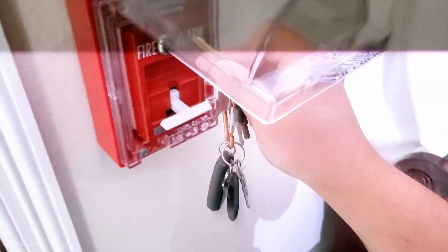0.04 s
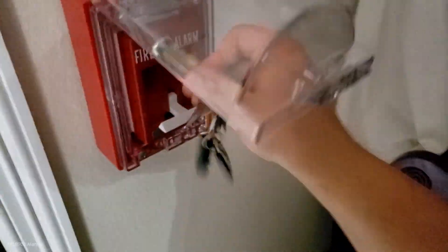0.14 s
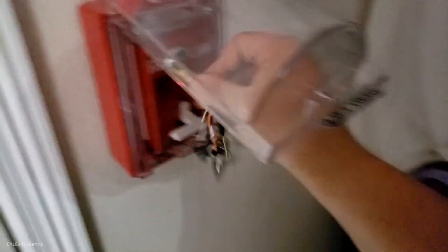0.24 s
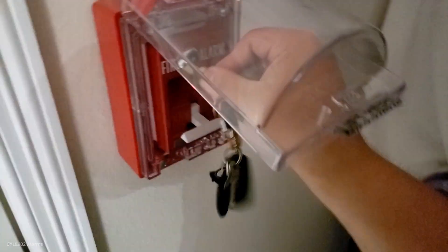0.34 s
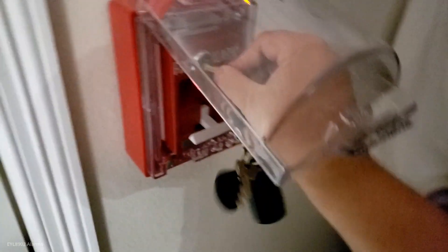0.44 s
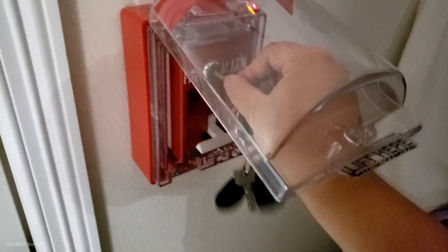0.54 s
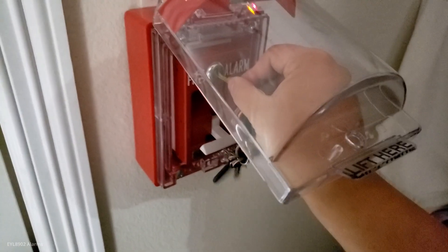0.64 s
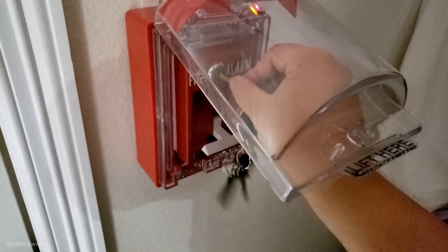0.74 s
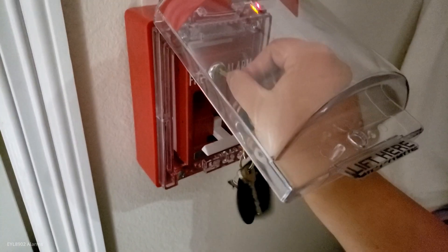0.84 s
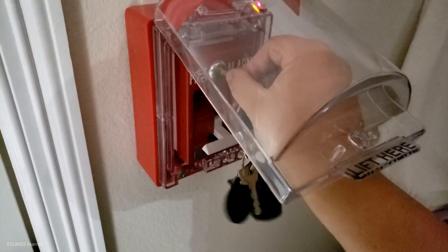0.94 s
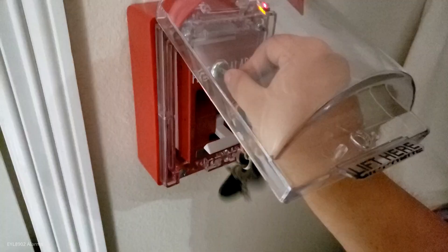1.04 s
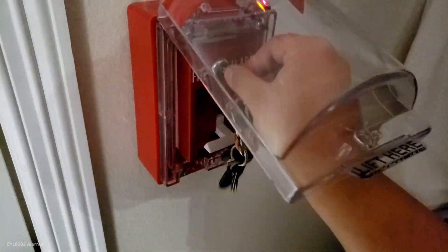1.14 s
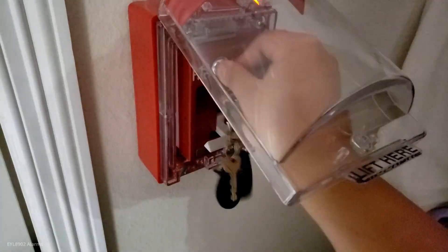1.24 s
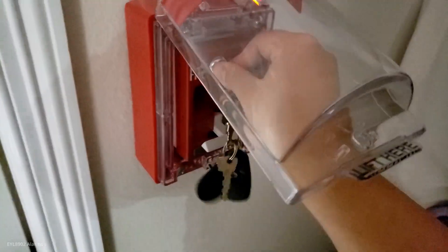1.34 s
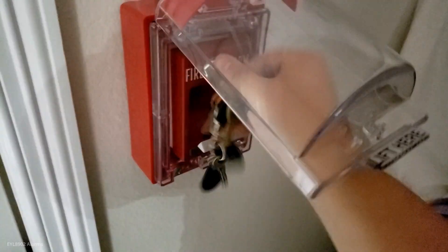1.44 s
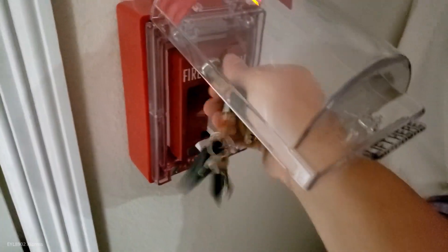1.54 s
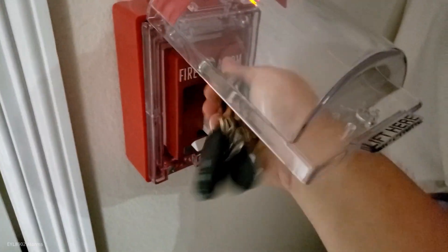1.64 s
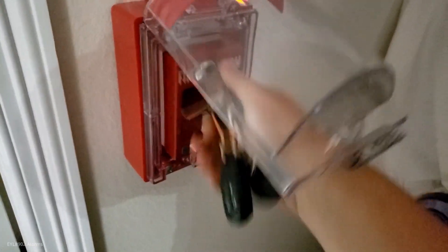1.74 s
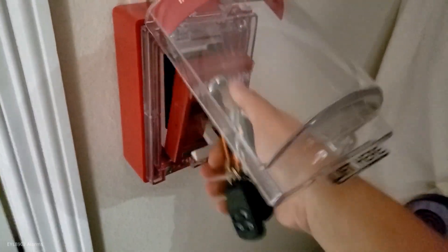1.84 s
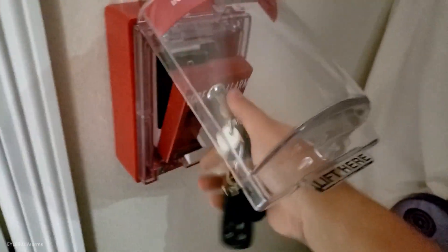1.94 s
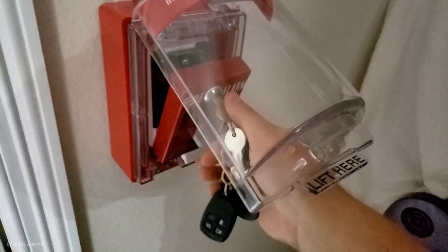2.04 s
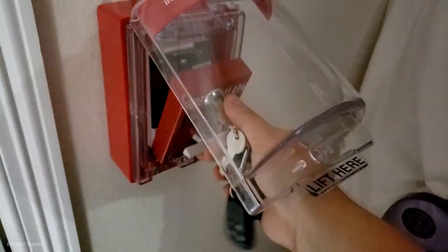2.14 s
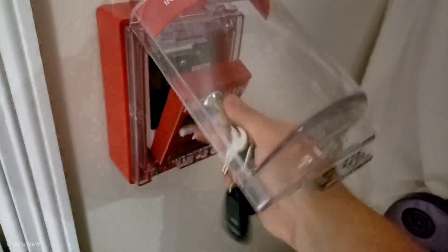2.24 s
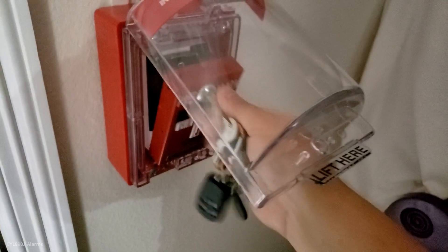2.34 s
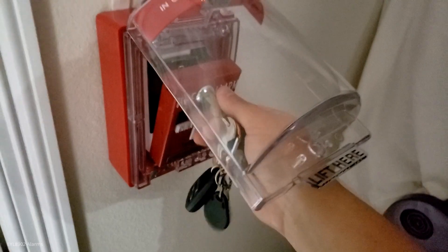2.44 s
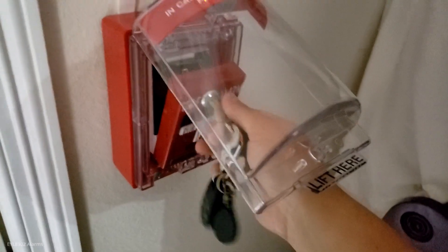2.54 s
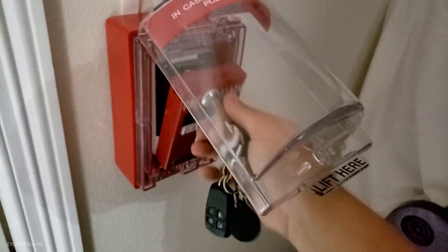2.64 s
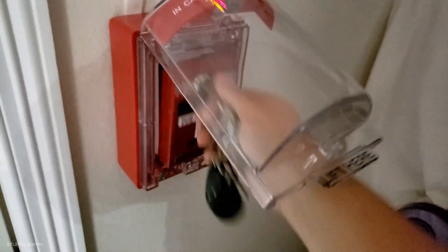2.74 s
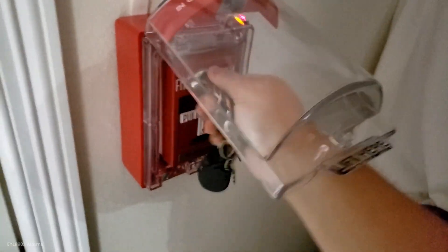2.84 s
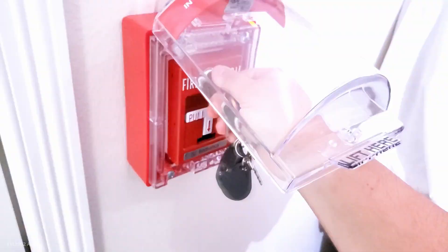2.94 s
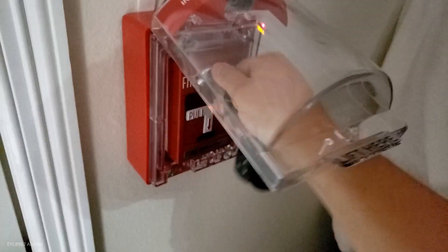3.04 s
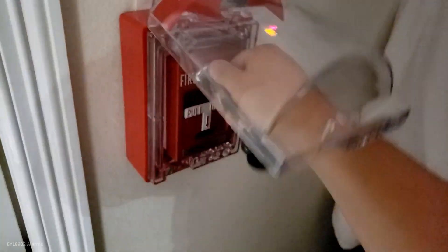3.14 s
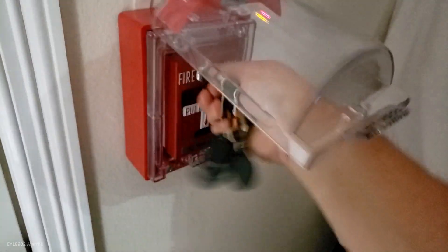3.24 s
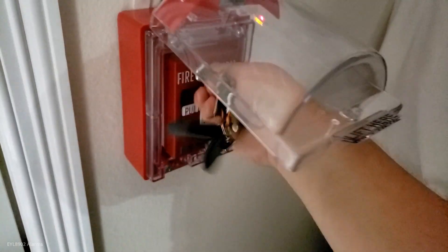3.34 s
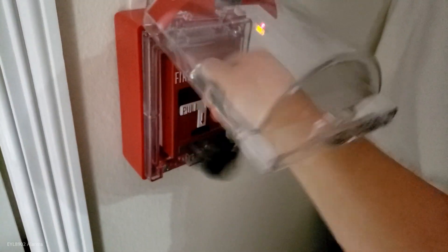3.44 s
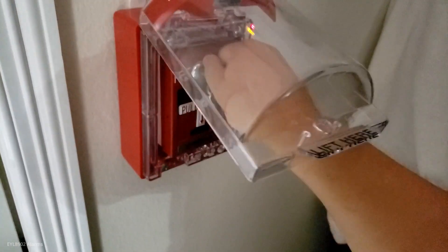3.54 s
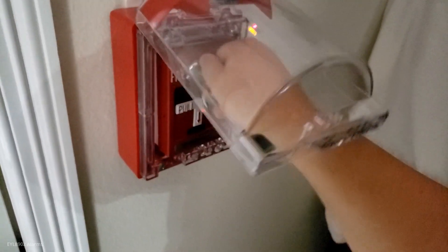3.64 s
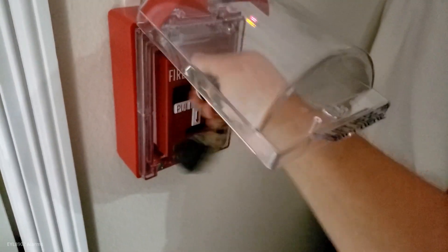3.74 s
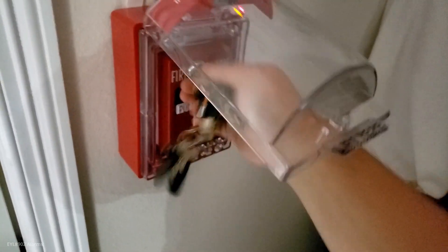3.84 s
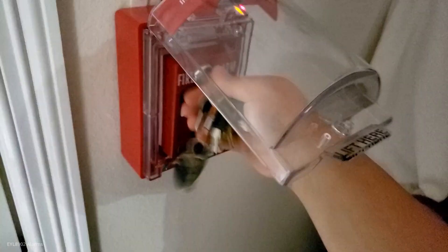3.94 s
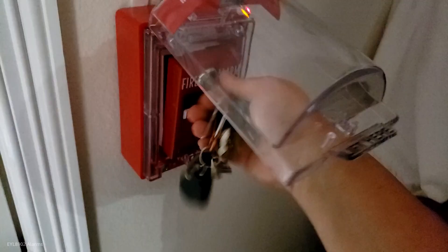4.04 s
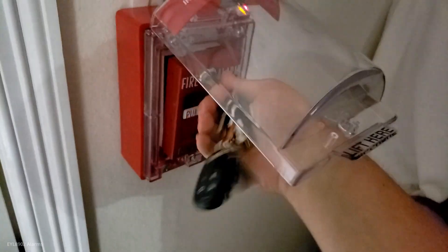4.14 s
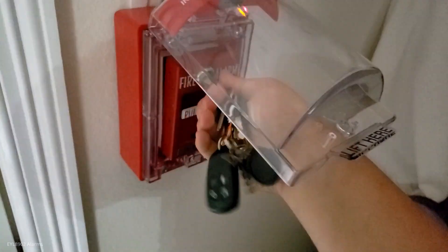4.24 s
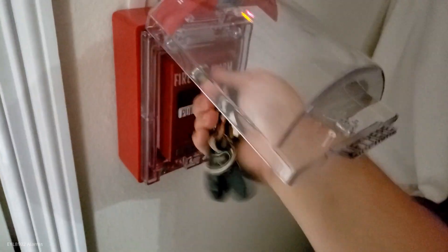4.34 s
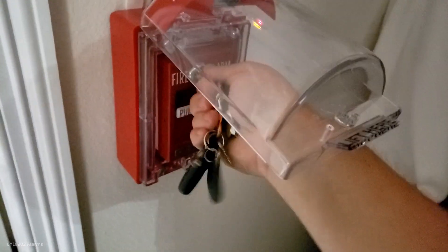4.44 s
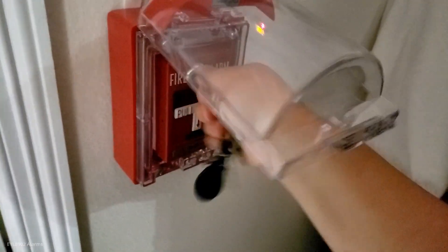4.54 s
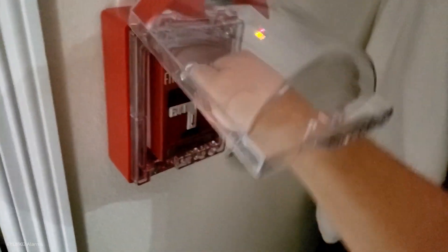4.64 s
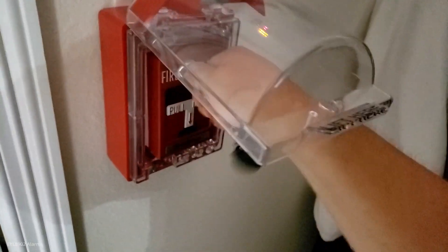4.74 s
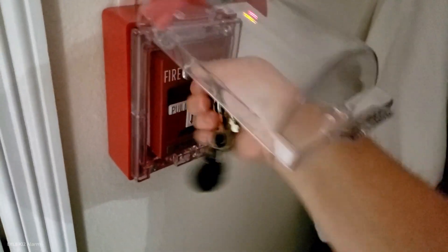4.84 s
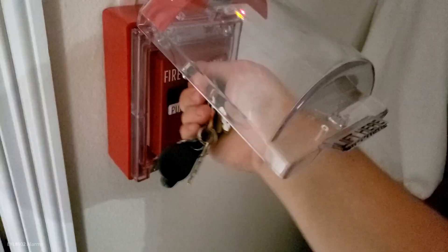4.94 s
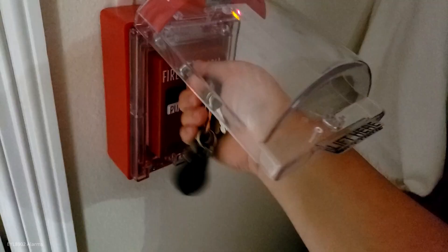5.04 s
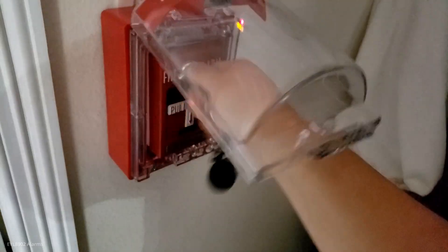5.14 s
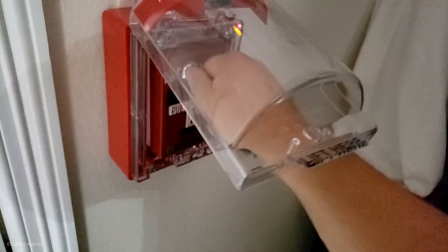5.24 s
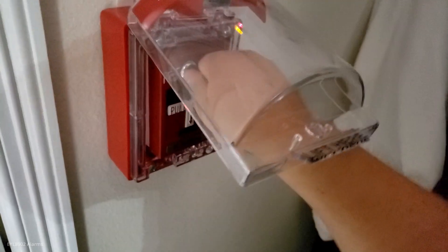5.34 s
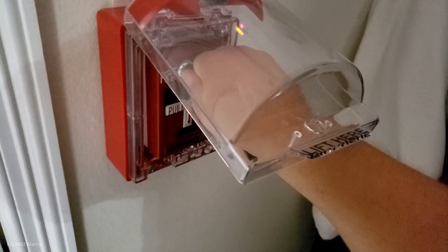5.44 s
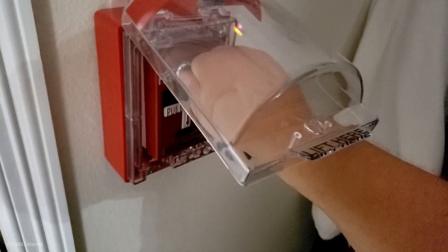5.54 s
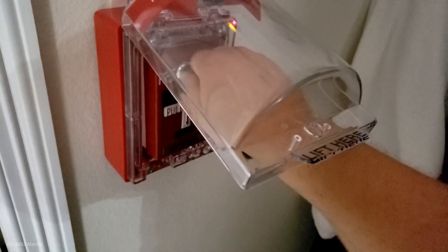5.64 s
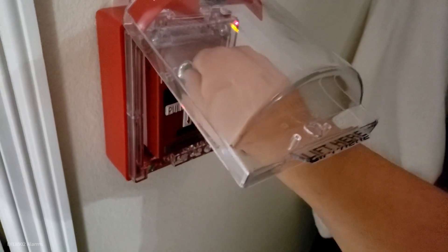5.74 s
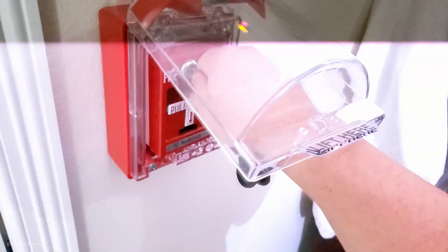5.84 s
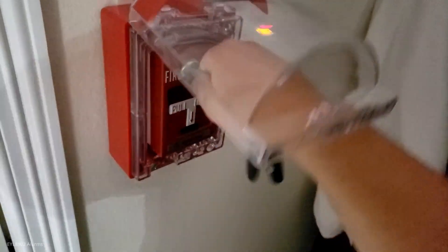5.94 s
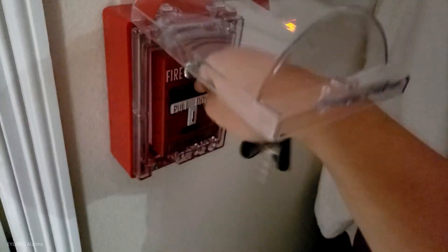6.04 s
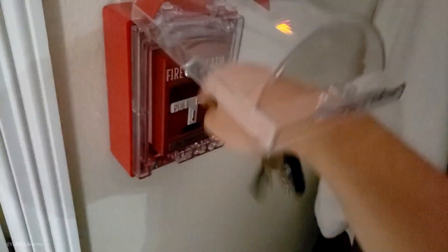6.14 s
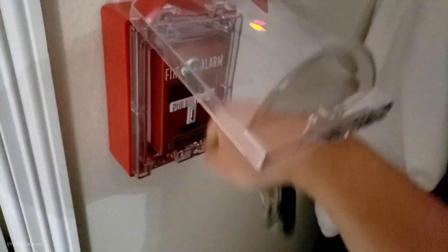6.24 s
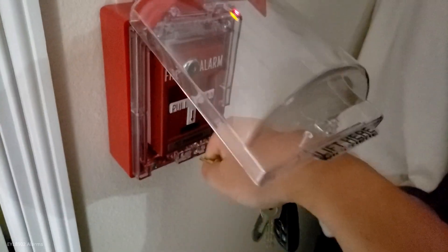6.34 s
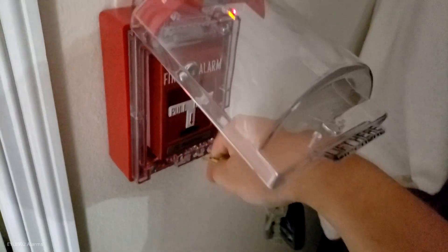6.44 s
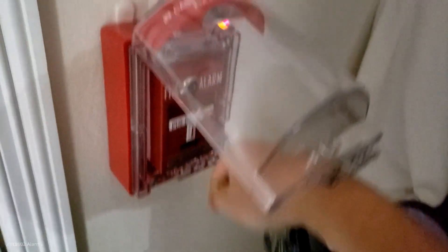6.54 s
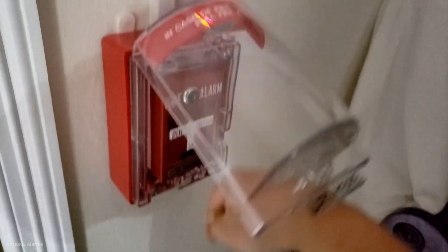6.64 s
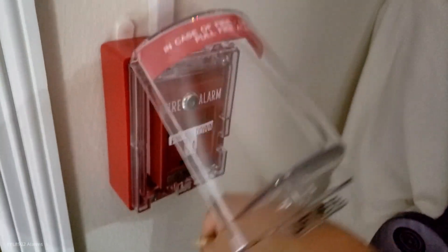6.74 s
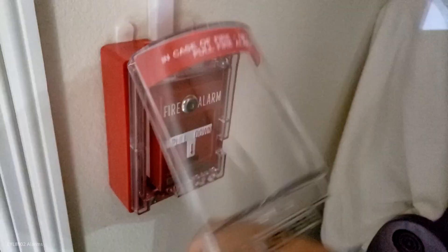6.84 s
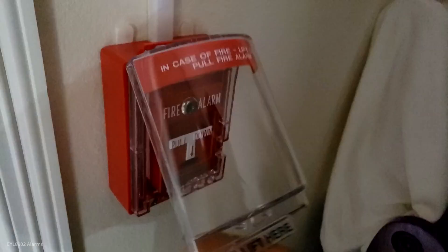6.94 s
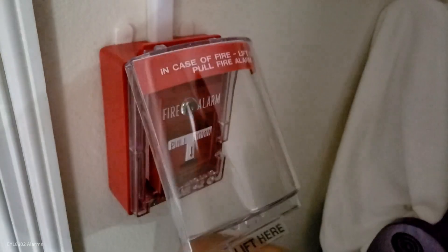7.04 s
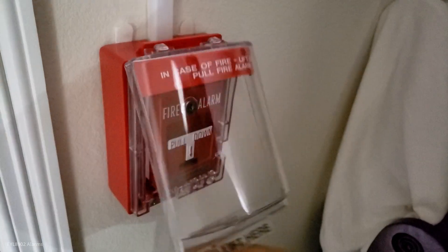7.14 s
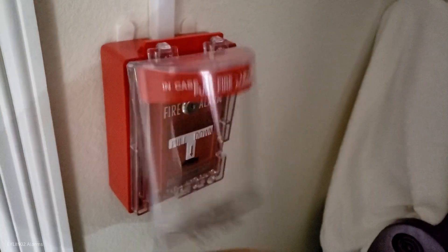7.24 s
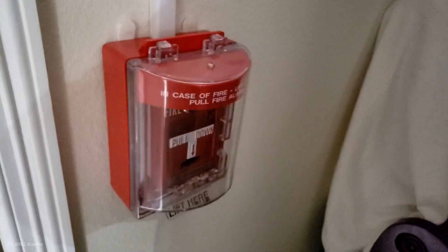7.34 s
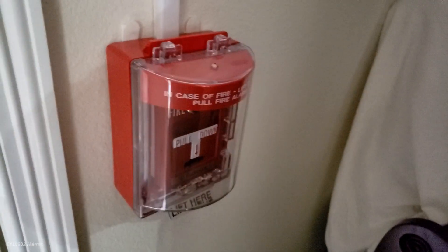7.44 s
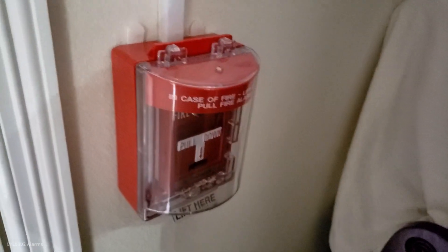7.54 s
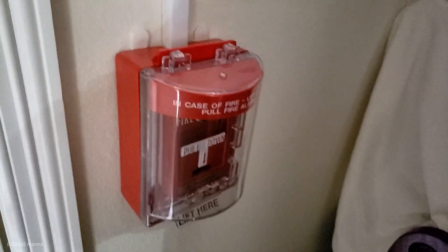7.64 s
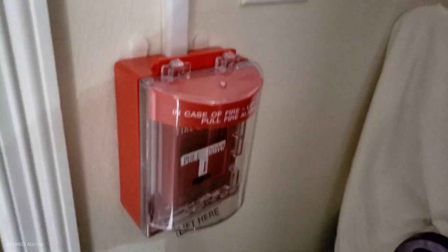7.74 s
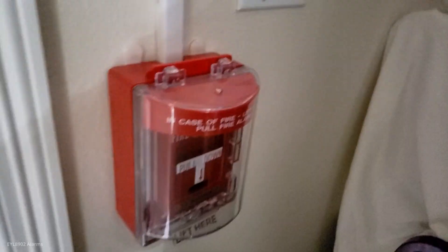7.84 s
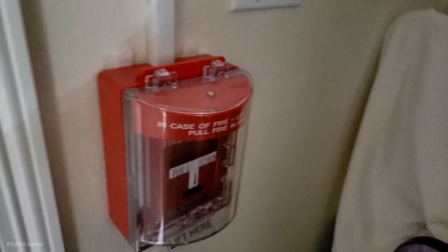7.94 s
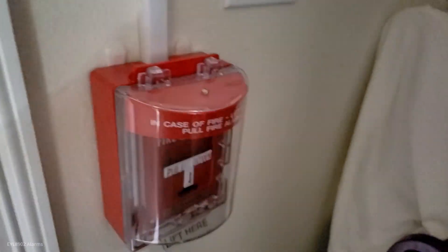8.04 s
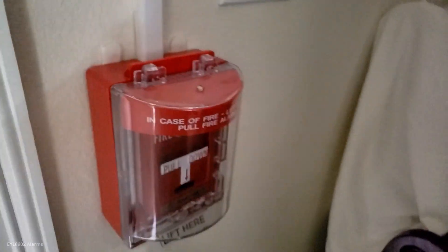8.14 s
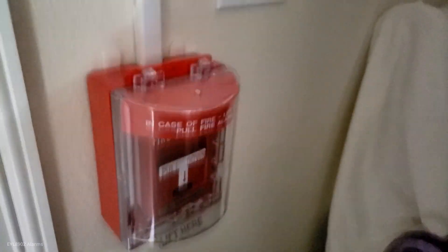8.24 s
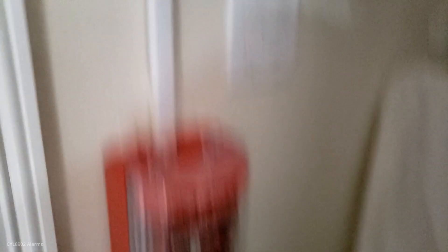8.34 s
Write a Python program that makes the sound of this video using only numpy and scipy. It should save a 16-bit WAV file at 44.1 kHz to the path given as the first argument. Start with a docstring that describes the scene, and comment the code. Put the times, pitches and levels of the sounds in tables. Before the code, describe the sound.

Close handling of a wall-mounted alarm box: keys tick and clink, plastic is scraped and pushed, and the lock plate clicks. Two hard clacks stand out in the first three seconds, followed by irregular knocking. Handling thins out, the clear cover claps down, near silence follows, then the caught keys rattle brightly at the end. Dry small room, faint hush, stereo pickup.

```python
"""Keys and fobs knock and rattle on a plastic wall box in a small furnished room: a bunch of keys works
its small lock, keys clink, the hand rubs and pushes the hollow housing. At last the hinged clear cover
drops shut and the bunch is caught in the hand. Knocks are noise bursts through housing resonances;
thuds, clinks, lock plate and cover are struck modes; handling is dense tiny contacts.
Two ports, a diffuse room and a quiet hush surround them."""
import sys
import numpy as np
from scipy import signal
from scipy.fft import rfft, irfft, next_fast_len
from scipy.io import wavfile

SR = 44100
rng = np.random.default_rng(int(sys.argv[2]) if len(sys.argv) > 2 else 0)


def volts_from_decibels(level):
    """Turn decibel levels (scalar or array-like) into linear amplitude factors."""
    exponent = np.asarray(level, float) / 20
    return 10 ** exponent


def wrap_up_sound(samples):
    """Save the sound to the file named by the first command line argument, as 16-bit audio."""
    columns = np.atleast_2d(samples).T
    # keep every value between -1 and 1, then stretch to whole-number steps
    tamed = np.clip(columns, -1, 1)
    steps = np.round(tamed * 32767).astype(np.int16)
    wavfile.write(sys.argv[1], SR, steps)


N = 370881
SIZE = 8192   # samples of one knock or tick

# room hush spectrum: f/Hz, density/dB
HUSH_SPECTRUM = [(24, -35.5), (40, 2), (118, -21), (180, -1), (276, -7.5), (372, -9.5), (697, -28),
                 (2320, 7), (4030, -4), (16000, -40)]
# room decay: f/Hz, t60/s
ROOM_T60 = [(100, .3), (700, .26), (2000, .3), (5000, .25), (13000, .2)]
# room level: f/Hz, level re direct/dB
ROOM_DB = [(100, -20), (450, -16), (1000, -8), (3000, -7), (14000, -7)]
# first port over second: f/Hz, level difference/dB
PORT_DB = [(60, 1), (500, -4), (850, 4.5), (1800, 5), (2700, 11), (4300, 6), (5500, 3), (7100, -2),
           (7800, -4), (9800, -1), (11000, -12.5), (12500, -10.5), (14500, -5)]
# first port ahead of second: f/Hz, phase/rad
PORT_LEAD_RAD = [(60, 0.65), (500, -1), (700, 1.38), (1600, 3), (2500, 1.02), (16000, 2.1)]
# power common to both ports: f/Hz, share/1
COMMON_SHARE = [(60, 1), (450, 1), (700, 0.94), (1200, 0.6), (1900, 0.32), (2900, 0.53), (4000, 0.41),
                (16000, 0.12)]
# busy hand: t/s, scrape level/dB, push level/dB, jingle level/dB
HANDLING = [(0, -55, -51.5, -67), (.3, -57.5, -72, -58), (.55, -73, -69, -68.5), (.94, -79, -60, -96),
            (1.29, -38, -42, -47.5), (1.38, -71, -52, -86), (1.6, -44, -46.5, -43.5),
            (1.83, -46.5, -49, -46.5), (2.22, -70, -67, -66.5), (2.36, -59, -48, -60.5),
            (2.6, -75, -72.5, -69.5), (3.2, -57, -57, -69.5), (3.3, -40.5, -42.5, -55.5),
            (3.68, -69.5, -67, -64.5), (3.95, -49, -55.5, -57), (4.4, -64, -58.5, -63.5),
            (4.64, -47, -51, -58), (4.8, -68, -59, -74), (5.36, -56, -50.5, -73.5), (5.64, -81, -71.5, -78),
            (5.76, -57.5, -52, -59.5), (6.09, -47, -45, -48.5), (6.35, -72.5, -60, -73),
            (6.74, -74.5, -86.5, -90), (7.0, -68.5, -60.5, -77), (7.42, -65, -79.5, -73.5),
            (7.96, -82, -97, -92), (8.08, -83, -95, -84), (8.18, -71.5, -89, -46), (8.26, -46.5, -60, -33),
            (8.36, -35.5, -55, -40), (8.41, -41, -54, -33)]
# cover bumped: t/s, level/dB
COVER_BUMPS = [(7.266, -40.5), (7.375, -27.5), (7.395, -22)]
# lock plate snapped: t/s, level/dB
PLATE_SNAPS = [(1.674, -33), (1.822, -35.5), (1.84, -32), (1.8557, -25.5), (3.2365, -35), (6.0615, -41.5)]
# key against key: t/s, level/dB
CLINKS = [(0.2384, -44), (0.2644, -40), (0.3431, -47), (0.3765, -34), (0.4309, -45), (0.4618, -33),
          (0.4888, -34), (1.3259, -40), (1.5743, -38.5), (1.7335, -27), (1.7988, -28.5), (1.8577, -33),
          (2.4209, -30.5), (2.58, -58.5), (3.272, -35), (3.6321, -44), (3.7848, -60), (3.9014, -40.5),
          (4.0731, -40.5), (4.1255, -42), (4.1704, -40), (4.2956, -36), (4.6418, -45), (4.7242, -44.5),
          (5.1577, -44), (5.3557, -51.5), (5.8945, -34.5), (5.9633, -44), (6.1689, -30), (6.3589, -53.5),
          (8.1125, -57)]
# long key on its ring: t/s, level/dB
RING_CLINKS = [(8.2067, -34), (8.2274, -21), (8.2457, -14), (8.2844, -16), (8.2994, -18), (8.3544, -16),
               (8.3894, -49)]
# key tips glancing off metal: t/s, level/dB, ringing f/Hz
TICKS = [(0.1344, -41, 5240), (0.1431, -32, 10260), (0.188, -33, 13600), (0.2149, -39, 12300),
         (0.3785, -23.5, 12200), (0.4823, -24, 12200), (0.5774, -42, 12200), (1.3223, -23.5, 12200),
         (1.6744, -38, 12200), (1.8144, -18.5, 12060), (1.9994, -32.5, 5220), (3.2546, -29.5, 10500),
         (3.378, -33, 5100), (3.4181, -36, 5300), (3.786, -33, 6120), (4.1709, -22, 12150),
         (4.2967, -30, 12100), (5.0295, -50, 12300), (5.893, -23, 12300), (6.1684, -31, 12200),
         (6.3584, -42, 12170), (8.1074, -49.5, 12250)]
# thuds of the hollow box: t/s, level/dB, leading f/Hz
THUDS = [(0.056, -30, 346), (0.166, -35.5, 151), (0.247, -34.5, 225), (0.427, -47.5, 151),
         (0.671, -30.5, 160), (0.846, -35.5, 107), (0.893, -34.5, 166), (1.123, -31, 161),
         (1.26, -20.5, 142), (1.38, -37, 167), (1.466, -21.5, 220), (2.293, -23.5, 520),
         (2.671, -38.5, 226), (2.833, -39, 380), (2.84, -20, 161), (3.071, -39, 353), (3.151, -34, 157),
         (3.272, -24.5, 235), (3.481, -32.5, 190), (3.568, -38.5, 365), (3.743, -45.5, 102),
         (3.889, -32.5, 226), (3.961, -38.5, 111), (4.147, -35.5, 364), (4.376, -24.5, 100),
         (4.543, -37, 167), (4.606, -32.5, 365), (4.85, -26, 151), (5.181, -27.5, 380), (5.358, -37, 167),
         (5.512, -40, 358), (5.734, -27.5, 215), (5.809, -28, 156.7), (6.053, -22.5, 164),
         (6.137, -32.5, 158), (6.307, -35.5, 177), (6.438, -39.5, 222.5), (6.82, -52.5, 175.5),
         (6.952, -30, 175.6), (7.291, -32.5, 225), (7.39, -19.5, 353), (8.204, -20.5, 495),
         (8.216, -23.5, 252), (8.275, -16.5, 159.7)]
# knocks on the box: t/s, level/dB, struck spot f/Hz, hardness (4-8 kHz)/dB, rattle t60/s
KNOCKS = [(.059, -27, 2510, -13, 0.057), (.075, -21.5, 2260, -13.5, .18), (.159, -28, 2410, -14, 0.11),
          (.225, -36, 2310, -2, 0.052), (.246, -16.5, 1390, -6.5, 0.08), (.375, -39, 3500, 0, 0.066),
          (.422, -38.5, 2110, -16, 0.081), (.538, -38.5, 2380, -7, 0.041), (.634, -32.5, 2730, -25, 0.21),
          (.654, -28, 2070, -11.5, 0.05), (.674, -19, 1360, -25, 0.036), (.712, -24.5, 1290, -7, 0.023),
          (.817, -37.5, 2050, -16, 0.1), (.844, -26.5, 1960, -10, .18), (.901, -22, 1970, -16.5, 0.13),
          (1.072, -23.5, 1560, -7.5, 0.23), (1.18, -23, 1030, -29, 0.2), (1.203, -19.5, 1370, -11.5, 0.26),
          (1.259, -16, 1050, -8, 0.12), (1.392, -29, 2500, -12.5, 0.073), (1.407, -27, 1560, -12, .077),
          (1.455, -20.5, 1410, -17.5, .15), (1.477, -16, 865, -18, 0.1), (1.516, -13, 1120, -12, 0.17),
          (1.556, -17.5, 1130, -8.5, 0.028), (1.606, -14, 3100, -10.5, 0.094), (1.661, -23, 1020, 0, 0.034),
          (1.724, -28, 2340, 4.5, 0.25), (1.781, -18.5, 2900, -2, 0.14), (1.859, -18, 1010, -2.5, 0.027),
          (1.972, -28, 2580, 4.5, 0.038), (1.99, -31, 3130, 2.5, 0.14), (2.027, -37, 2780, 1.4, 0.063),
          (2.079, -41, 2930, -6.5, 0.049), (2.173, -38, 3000, 1.5, 0.03), (2.214, -39.5, 3340, -1.5, 0.059),
          (2.277, -25.5, 2240, -2.5, 0.17), (2.288, -6, 2400, -2.5, 0.12), (2.326, -13, 2240, -10.5, .064),
          (2.404, -29, 2700, -3.5, 0.2), (2.504, -32, 2440, -8, 0.027), (2.576, -39.5, 2940, -2.5, 0.031),
          (2.653, -41.5, 2450, -19.5, .084), (2.669, -34.5, 2380, -13.5, 0.3),
          (2.818, -32, 1500, -10, 0.22), (2.843, -3, 1120, -10.5, 0.02), (3.07, -29.5, 2660, -16, 0.068),
          (3.154, -11.5, 2380, -6.5, 0.035), (3.24, -31, 1020, -11, 0.22), (3.274, -17.5, 2600, -12, 0.071),
          (3.296, -13, 2120, -18, 0.068), (3.323, -17, 1530, -15.5, 0.045), (3.405, -33.5, 2070, -12, 0.12),
          (3.482, -22, 2710, -20, 0.15), (3.524, -23, 1450, -7, 0.037), (3.574, -26, 865, -13.5, 0.11),
          (3.629, -37, 2220, 1, 0.083), (3.752, -37.5, 2370, 0, 0.12), (3.871, -28, 2120, -22, 0.089),
          (3.971, -12.5, 2700, -9.5, 0.042), (4.018, -32, 1040, -1, 0.18), (4.085, -32.5, 1820, -19, 0.026),
          (4.121, -31, 1510, -17, 0.13), (4.154, -30.5, 1500, 5.5, 0.11), (4.227, -30, 1490, -14, 0.068),
          (4.318, -36.5, 3000, 10, 0.25), (4.382, -7.5, 1470, -10.5, 0.042), (4.432, -24, 1440, -22, 0.083),
          (4.527, -33, 3230, 0, 0.024), (4.549, -10.5, 2020, -7, 0.039), (4.603, -18.5, 2580, -11, 0.1),
          (4.836, -32.5, 2750, -10, 0.079), (4.854, -13.5, 1740, -10, 0.097),
          (4.881, -17, 1910, -18.5, 0.09), (5.125, -36, 1610, -22, .12), (5.139, -26, 2050, -9.5, 0.14),
          (5.184, -16, 2850, -19.5, 0.081), (5.259, -36, 860, -15.5, 0.18), (5.367, -26, 1430, -10, 0.049),
          (5.423, -22, 1520, -8.5, 0.1), (5.514, -16.5, 2530, -5, 0.03), (5.552, -35.5, 1430, -25, 0.028),
          (5.694, -33.5, 1430, -11.5, .04), (5.741, -37, 1400, 1, 0.13), (5.806, -34, 1490, -2.5, 0.14),
          (5.885, -28, 3280, -1.5, 0.26), (5.931, -27, 2930, 7, 0.061), (5.951, -28.5, 2810, -0.5, 0.2),
          (5.996, -29.5, 2830, -2.5, 0.13), (6.028, -26.5, 1890, 1, .16), (6.059, -11, 1390, -10.5, 0.051),
          (6.141, -25, 1870, -2, .024), (6.211, -31.5, 3340, -0.5, 0.033), (6.245, -35, 3300, 1, 0.12),
          (6.308, -29, 2800, -16, 0.1), (6.473, -42, 1390, -20, .053), (6.492, -38, 2240, -17, 0.053),
          (6.954, -31.5, 2970, -21, .11), (6.985, -35, 857, -18.5, 0.084), (7.243, -40, 2620, -23.5, 0.17),
          (7.262, -24.5, 1520, -16.5, 0.22), (7.308, -23.5, 2120, -23, 0.23), (7.366, -26, 900, -14, .04),
          (7.375, -4.5, 2600, -9.5, .12), (7.391, -6.5, 2400, -9, 0.13), (8.202, -15, 3420, -11.5, 0.2),
          (8.246, -8, 2700, -6, 0.14), (8.27, -11.5, 3500, -8, .18), (8.316, -16.5, 2210, -9, 0.063)]
# modes of hollow box, cover, lock plate, keys, long key: f/Hz, level/dB, t60/s
WALL_BOX = [(58, -16, .08), (112, -4, .12), (156, 0, .13), (218, -4, .1), (285, -11, .06), (372, -7, .1),
            (494, -6, .08), (600, -10, .05)]
COVER = [(357, -1, .15), (354, -11, .55), (385, -8, .09), (424, -3, .15), (890, -10, .12), (1545, -4, .18),
         (2143, -7, .13), (2396, -7, .16)]
PLATE = [(1028, 0, .26), (1042, -11, .1)]
KEYS = [(6207, -20, .12), (9350, -19, .05), (10260, -15, .15), (10470, -19, .1), (12110, -6, .1),
        (12190, -2, .11), (12280, -5, .1), (15160, -12, .12)]
LONG_KEY = [(13200, -7, .1), (13740, -11, .07), (14480, -20, .06)]
# broad contact crack: f/Hz, level/dB
CRACK = [(400, -7.5), (700, -12), (1000, -5.5), (1800, -4.5), (2700, -2), (4000, -14), (6300, -13.5),
         (8000, -22.5), (10000, -11.5), (12500, -9), (15500, -12.5)]
# resonances of housing and key tips: f/Hz, width/Hz, lift over crack/dB
HOUSING = [(516, 17, 7.5), (860, 47, 6), (1030, 150, 6), (1390, 220, 5.5), (1525, 120, 6), (1906, 270, 3),
           (2120, 65, 4), (2330, 30, 3.5), (2850, 47, 1), (3094, 260, 3.5), (3958, 800, 6.5),
           (4600, 220, 7.5), (5640, 190, 4.5), (5750, 250, -0.5)]
KEY_TIPS = [(5300, 150, 8), (6200, 120, 8), (10300, 150, 7), (12190, 220, 9), (13750, 200, 7),
            (15200, 200, 7)]
# corners: body end, full hardness, metal edge start, full metal edge: f/Hz
TILT_HZ = [3000, 5500, 6820, 11440]
# bass loss of light blows: full below, none above: f/Hz
LIGHT_BASS_HZ = [703, 2200]

HUSH_DB = -87
KEYS_LEAVE_S = 6.5   # end of swinging and chance taps
# push lingering after each thud; high thuds are glancing and leave less
LEAN_DB, LEAN_DB_PER_OCTAVE, LEAN_RISE_S, LEAN_T60_S = -8.0, -3.5, 0.012, 0.31
COVER_SHUT_S, HAND_GONE_DB = 7.2, -20   # later thuds leave less push
BRUSH_RE_JINGLE_DB, SWAY_RE_CLINK_DB, SWAY_T60_S = -12.5, -33, 0.73
FIRM_SHARE = 0.75   # power of a touch that is one firm first contact
TAPS_PER_S, TAP_RE_SCRAPE_DB, TAP_SPREAD_DB = 10, 12.0, 4
TAP_HARD_DB, TAP_HARD_SPREAD_DB, TAP_T60_S = -4.0, 4.9, 0.05
EDGE_RE_HARD_DB, EDGE_DB_PER_DB = -7, -0.075   # louder blows carry less metal edge
EDGE_FOLLOWS_JINGLE = 0.38   # share of jingle's lead over scrape
LIGHT_BELOW_DB, LIGHT_LOSS_DB_PER_DB = -24.5, 0.41   # light hard blows barely move the housing


def at_hz(points, hz):
    """Short spectrum read on a log frequency axis."""
    f, value = np.transpose(points)
    return np.interp(np.log(hz + 1), np.log(f), value)


def rms_one(x):
    """Scale to unit power."""
    return x / np.sqrt(np.mean(np.abs(x) ** 2) + 1e-20)


def mode_bank(modes, hz):
    """Frequency response of each decaying sine, one row a mode."""
    f, level_db, t60 = np.transpose(modes)[:, :, None]
    r = volts_from_decibels(-60 / (t60 * SR))
    w = 2 * np.pi * f / SR
    z = np.exp(-2j * np.pi * hz / SR)
    return volts_from_decibels(level_db) * np.sin(w) * z / (1 - 2 * r * np.cos(w) * z + r * r * z * z)


def band(hz, low_hz, high_hz):
    """Causal band-pass response."""
    sos = signal.butter(3, [low_hz, high_hz], "band", fs=SR, output="sos")
    return signal.sosfreqz(sos, hz, fs=SR)[1]


def grit(shape, per_s, spread_db):
    """Random small contacts of uneven size and sign."""
    sizes = volts_from_decibels(spread_db * np.minimum(rng.exponential(1, shape), 4))
    signs = rng.choice([-1, 1], shape)
    return sizes * signs * (rng.random(shape) < per_s / SR)


def add(out, at_s, bursts):
    """Lay each burst down at its moment."""
    for k, i in enumerate((np.asarray(at_s) * SR).astype(int)):
        out[..., i:i + bursts.shape[-1]] += bursts[..., k, :N - i]
    return out


def two_paths(common, left, right, hz):
    """Bass reaches both ports alike, treble largely by scattered paths of its own."""
    share = at_hz(COMMON_SHARE, hz)
    return np.sqrt(share) * common + np.sqrt(1 - share) * np.array([left, right])


def near_pitch(modes, spot_hz, octaves):
    """Modes close to the pitch of the struck spot are favoured."""
    distance = np.log2(np.array(modes)[:, 0] / spot_hz) / octaves
    return np.exp(-.5 * distance ** 2)


def body(hz, strengths, tilt_db=0):
    """Contact crack lifted at housing and key resonances; minimum phase, so nothing sounds early."""
    f, width, lift_db = np.transpose(HOUSING + KEY_TIPS)[:, :, None]
    resonances_db = strengths @ (lift_db / (1 + (2 * (hz - f) / width) ** 2))
    level_db = at_hz(CRACK, hz) + tilt_db + resonances_db
    cepstrum = irfft(level_db * np.log(10) / 20)
    half = cepstrum.shape[-1] // 2
    cepstrum[..., 1:half] *= 2   # fold to minimum phase
    cepstrum[..., half + 1:] = 0
    return np.exp(rfft(cepstrum))


def hush(size):
    """Steady shaped noise, independent at the two ports."""
    hz = np.fft.rfftfreq(size, 1 / SR)
    noise = rfft(rng.standard_normal((2, size)))
    return volts_from_decibels(HUSH_DB) * rms_one(irfft(noise * volts_from_decibels(at_hz(HUSH_SPECTRUM, hz)), size)[:, :N])


def room(size):
    """Diffuse tail, unrelated at the two ports, with a decay for each octave."""
    t, hz = np.arange(SR // 2) / SR, np.fft.rfftfreq(size, 1 / SR)
    out = 0
    for mid_hz in 80 * 2.0 ** np.arange(8):
        decay = volts_from_decibels(-60 * t / at_hz(ROOM_T60, mid_hz)) * np.clip(t / 0.0013, 0, 1)
        tail = rng.standard_normal((2, len(t))) * decay
        tail /= np.sqrt(np.sum(tail ** 2, axis=1, keepdims=True))
        octaves_off = np.abs(np.log2(np.clip(hz, 80, 10240) / mid_hz))
        out = out + rfft(tail, size) * np.sqrt(np.clip(1 - octaves_off, 0, 1))
    return out * volts_from_decibels(at_hz(ROOM_DB, hz))


def port_responses(hz):
    """Level and phase difference split evenly over two ports of unit mean magnitude."""
    side = np.array([[.5], [-.5]])
    ports = volts_from_decibels(side * at_hz(PORT_DB, hz)) * np.exp(1j * side * at_hz(PORT_LEAD_RAD, hz))
    return ports / np.abs(ports).mean(axis=0)


def hand(at_s):
    """Scrape, push and jingle levels in dB at these moments."""
    s, *levels = np.transpose(HANDLING)
    return [np.interp(at_s, s, db) for db in levels]


def aftermath(events, gain_db, rise_s, t60_s):
    """A level that swells after each event and dies away."""
    s, level_db = np.transpose(events)[:2]
    kicks = np.zeros(N)
    np.add.at(kicks, (s * SR).astype(int), volts_from_decibels(level_db + gain_db))
    fall, rise = volts_from_decibels(-60 / (t60_s * SR)), np.exp(-1 / (rise_s * SR))
    return signal.lfilter([1 - rise], np.convolve([1, -fall], [1, -rise]), kicks + 1e-18)


def handling():
    """Dense tiny contacts excite housing, hollow box and key treble while the hand works."""
    scrape, push, jingle = volts_from_decibels(np.array(hand(np.arange(N) / SR)))
    thud_s, _, thud_hz = np.transpose(THUDS)
    lean_db = LEAN_DB + LEAN_DB_PER_OCTAVE * np.log2(np.maximum(thud_hz / 180.0, 1))
    lean_db = lean_db + HAND_GONE_DB * (thud_s > COVER_SHUT_S)
    push = push + aftermath(THUDS, lean_db, LEAN_RISE_S, LEAN_T60_S)
    size = 2 * next_fast_len(N // 2 + SIZE)
    hz = np.fft.rfftfreq(size, 1 / SR)
    shell = body(hz, np.full(len(HOUSING + KEY_TIPS), .6))
    hollow = mode_bank(WALL_BOX, hz).sum(axis=0)
    out = 0
    for level, per_s, colour in ((scrape, 1200.0, shell * band(hz, 320, 8000)),
                                 (push, 400.0, hollow * band(hz, 50, 400)),
                                 (jingle, 900.0, shell * band(hz, 7000, 17000))):
        contacts = rfft(level * rms_one(grit((3, N), per_s, spread_db=3.5)), size)
        out = out + two_paths(*contacts, hz) * rms_one(colour)
    return irfft(out, size)[:, :N]


def swing():
    """Sparse brushes keep the key modes ringing, more so after each clink."""
    t = np.arange(N) / SR
    size = 2 * next_fast_len(N // 2 + SIZE)
    hz = np.fft.rfftfreq(size, 1 / SR)
    brushing = volts_from_decibels(hand(t)[2] + BRUSH_RE_JINGLE_DB)
    swaying = aftermath(CLINKS, SWAY_RE_CLINK_DB, .02, SWAY_T60_S)
    level = (brushing + swaying) * (t < KEYS_LEAVE_S)
    brushes = rfft(level * rms_one(grit((3, N), per_s=150.0, spread_db=7.0)), size)
    ringing = rms_one(mode_bank(KEYS, hz).sum(axis=0))
    return irfft(two_paths(*brushes, hz) * ringing, size)[:, :N]


def struck(events, modes, touch_s):
    """A firm contact plus brief chatter sets every mode ringing with a strength of its own."""
    s, level_db = np.transpose(events)
    size = 4 * SIZE
    hz = np.fft.rfftfreq(size, 1 / SR)
    strengths = volts_from_decibels(level_db[:, None] + rng.normal(0, 3, (len(s), len(modes))))
    chatter = rng.standard_normal((3, len(s), size)) * np.exp(-np.arange(size) / SR / touch_s)
    chatter = rfft(chatter / np.sqrt(np.sum(chatter ** 2, axis=2, keepdims=True)))
    chatter[0] = np.sqrt(FIRM_SHARE) + np.sqrt(1 - FIRM_SHARE) * chatter[0]
    ringing = irfft(two_paths(*chatter, hz) * (strengths @ mode_bank(modes, hz)), size)
    return add(np.zeros((2, N)), s, ringing * np.linspace(1, 0, size))


def cover_bumps():
    """The bumped cover booms in its panel modes."""
    return struck(COVER_BUMPS, COVER, touch_s=0.00074)


def plate_snaps():
    """The snapped lock plate rings in two close modes."""
    return struck(PLATE_SNAPS, PLATE, touch_s=0.0083)


def key_clinks():
    """Key against key rings the high key modes."""
    return struck(CLINKS, KEYS, touch_s=0.0023)


def ring_clinks():
    """The long key rings against its ring."""
    return struck(RING_CLINKS, LONG_KEY, touch_s=0.0023)


def ticks():
    """A key tip glances off metal: a bright snap and a short ring at its own pitch."""
    s, level_db, ring_hz = np.transpose(TICKS)[:, :, None]
    hz, t = np.fft.rfftfreq(SIZE, 1 / SR), np.arange(SIZE) / SR
    snap = rfft(rng.standard_normal((3, len(s), SIZE)) * np.exp(-t / 0.00083))
    ring = rfft(np.sin(2 * np.pi * ring_hz * t) * volts_from_decibels(-60 * t / 0.092))
    out = irfft(two_paths(*snap, hz) * (band(hz, 2500, 18000) + volts_from_decibels(-22.5) * ring), SIZE)
    out = out / np.abs(out).max(axis=(0, 2), keepdims=True)
    return add(np.zeros((2, N)), s[:, 0], out * volts_from_decibels(level_db + 5.0))


def thuds():
    """A soft push of some milliseconds rings the hollow box, mostly at the pushed panel's mode."""
    s, level_db, spot_hz = np.transpose(THUDS)[:, :, None]
    size = 2 * SIZE
    hz, t = np.fft.rfftfreq(size, 1 / SR), np.arange(size) / SR
    push = rfft(rng.standard_normal((len(s), size)) * np.exp(-t / 0.01))
    strengths = volts_from_decibels(rng.normal(0, 2, (len(s), len(WALL_BOX))))
    strengths = strengths * (.1 + near_pitch(WALL_BOX, spot_hz, octaves=.21))
    out = irfft(push * (strengths @ mode_bank(WALL_BOX, hz)) * band(hz, 38, 700), size)
    out = out / np.abs(out).max(axis=1, keepdims=True)
    return add(np.zeros(N), s[:, 0], out * volts_from_decibels(level_db - 2.0))


def taps():
    """Between knocks the bunch taps the box at random, at a level following the scrape."""
    when, size, spot, hard = rng.random((int(TAPS_PER_S * KEYS_LEAVE_S), 4)).T
    s = when * KEYS_LEAVE_S
    level_db = hand(s)[0] + TAP_RE_SCRAPE_DB + TAP_SPREAD_DB * (2 * size - 1)
    spot_hz = 1400 * 2 ** (0.89 * spot)
    hard_db = TAP_HARD_DB + TAP_HARD_SPREAD_DB * (2 * hard - 1)
    return np.transpose([s, level_db, spot_hz, hard_db, np.full(len(s), TAP_T60_S)])


def bounces(count, t, per_s, dying_s):
    """The loose bunch bounces: a first contact, then uneven further ones, each a short spurt."""
    hits = np.abs(grit((count, len(t)), per_s, spread_db=0.0))
    hits[:, 0] = 1.04
    spurt = (1 - np.exp(-t / 0.0007)) * np.exp(-t / dying_s)
    return irfft(rfft(hits, 2 * len(t)) * rfft(spurt, 2 * len(t)))[:, :len(t)]


def blow_tilt_db(hz, s, level_db, hard_db):
    """Harder blows are brighter; light hard ones lose bass."""
    scrape_db, _, jingle_db = hand(s)
    edge_db = hard_db + EDGE_RE_HARD_DB + EDGE_DB_PER_DB * (level_db - level_db.mean())
    edge_db = edge_db + EDGE_FOLLOWS_JINGLE * (jingle_db - scrape_db)
    edge = np.interp(hz, TILT_HZ[2:], [0, 1])
    middle = np.interp(hz, TILT_HZ[:2], [0, 1]) - edge
    light_db = np.maximum(LIGHT_BELOW_DB - level_db, 0) * np.clip(1 + hard_db / 13.0, 0, 1)
    bass_loss_db = LIGHT_LOSS_DB_PER_DB * light_db * np.interp(hz, LIGHT_BASS_HZ, [1, 0])
    return middle * (hard_db + 11.5) + edge * (edge_db + 8.5) - bass_loss_db


def knocks():
    """A blow is a sharp first contact and a dense dying rattle through the housing."""
    s, level_db, spot_hz, hard_db, t60 = np.transpose(np.vstack([KNOCKS, taps()]))[:, :, None]
    hz, t = np.fft.rfftfreq(SIZE, 1 / SR), np.arange(SIZE) / SR
    contacts = grit((3, len(s), SIZE), per_s=9000.0, spread_db=3.0)
    swell = 1 - np.exp(-t / 0.0016) + bounces(len(s), t, per_s=110.0, dying_s=0.0072)
    rattle = rfft(contacts * swell * volts_from_decibels(-60 * t / np.clip(t60, .01, .18)))
    resonances = HOUSING + KEY_TIPS
    strengths = 1.5 * rng.uniform(0, 1, (len(s), len(resonances))) ** 2
    strengths = strengths + 1.2 * near_pitch(resonances, spot_hz, octaves=0.38)
    colour = body(hz, strengths, blow_tilt_db(hz, s, level_db, hard_db)) * band(hz, 380, 17000)
    sound = two_paths(*rattle, hz) * colour
    # level is set by the peak within 700-4000 Hz
    middle = irfft(sound.mean(axis=0) * band(hz, 700, 4000), SIZE)
    peak = np.abs(middle).max(axis=1, keepdims=True)
    out = irfft(sound, SIZE) / peak * volts_from_decibels(level_db - 1.5)
    return add(np.zeros((2, N)), s[:, 0], out * np.clip((t[-1] - t) / .05, 0, 1))


def scene():
    """All contacts reach two ports directly and by the room, over its hush."""
    near = handling() + swing() + cover_bumps() + plate_snaps() + key_clinks() + ring_clinks()
    near = near + ticks() + thuds() + knocks()
    size = next_fast_len(N + SR)
    hz = np.fft.rfftfreq(size, 1 / SR)
    at_ports = rfft(near, size) * port_responses(hz) * (1 + room(size))
    return irfft(at_ports, size)[:, :N] + hush(size)


def roll_off(x):
    """The treble ends steeply here."""
    return signal.sosfilt(signal.butter(12, 17010, fs=SR, output="sos"), x)


def record(dry):
    """Peaks are rounded by soft saturation, then the top is cut."""
    rounded = 1.557 * np.tanh(dry / 1.566)
    top_cut = signal.cheby2(12, 45, 16350, fs=SR, output="sos")   # 45 dB down from 16350 Hz
    mix = signal.sosfilt(top_cut, rounded)
    return roll_off(mix)


dry = scene()
out = record(dry)
wrap_up_sound(out)
```